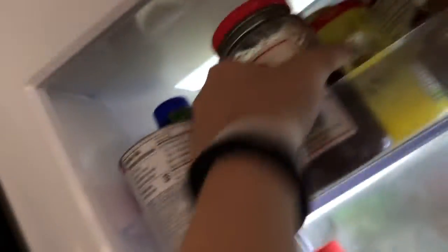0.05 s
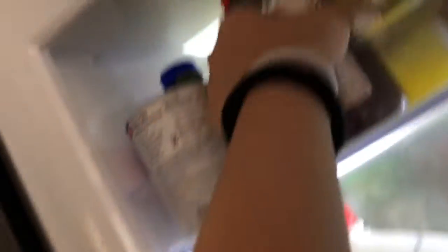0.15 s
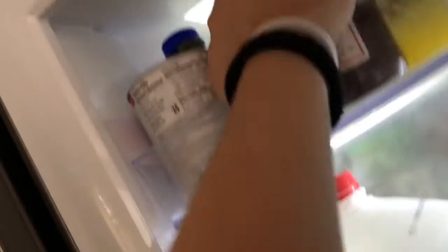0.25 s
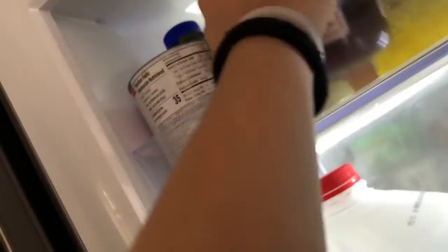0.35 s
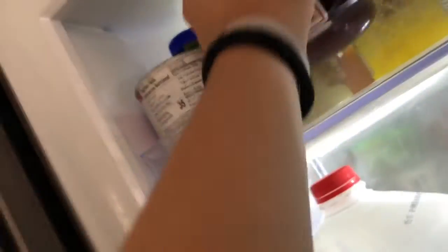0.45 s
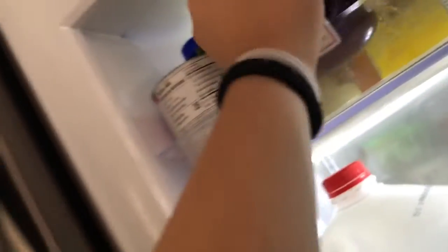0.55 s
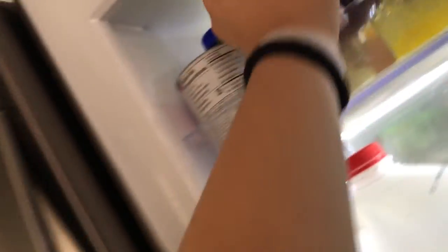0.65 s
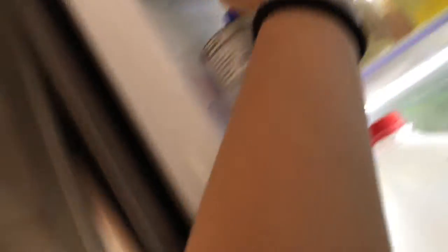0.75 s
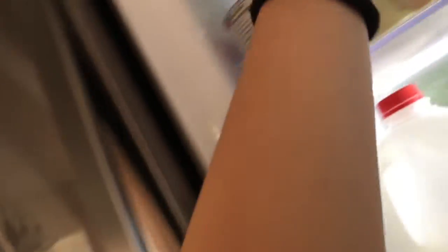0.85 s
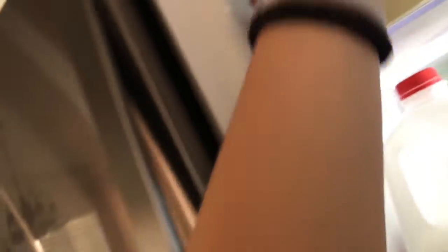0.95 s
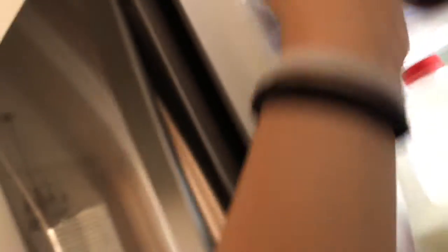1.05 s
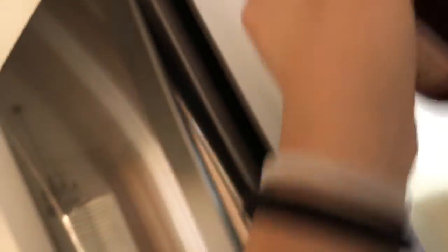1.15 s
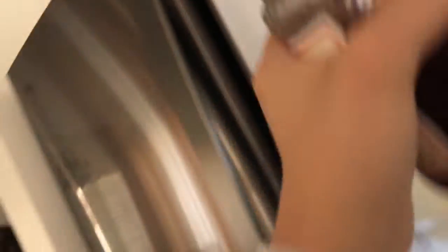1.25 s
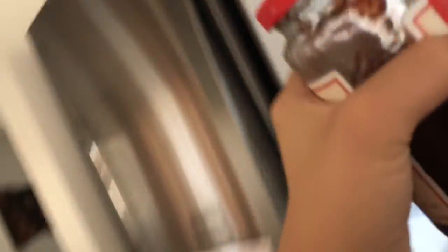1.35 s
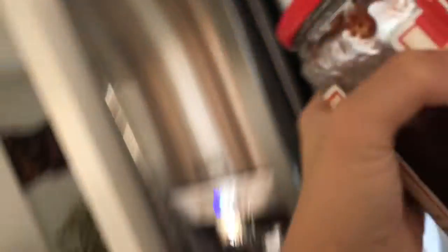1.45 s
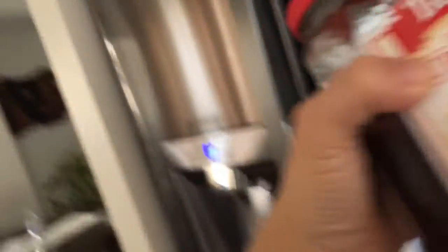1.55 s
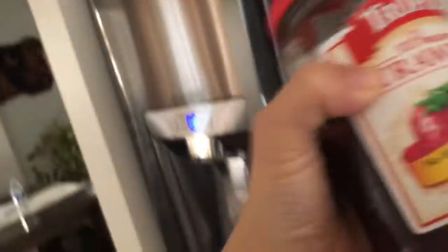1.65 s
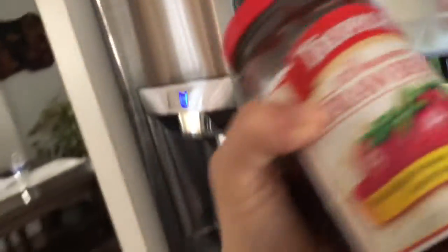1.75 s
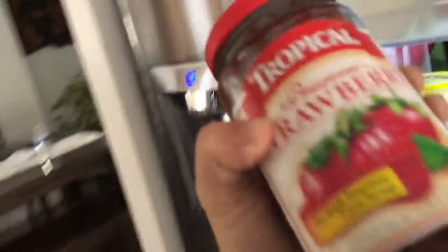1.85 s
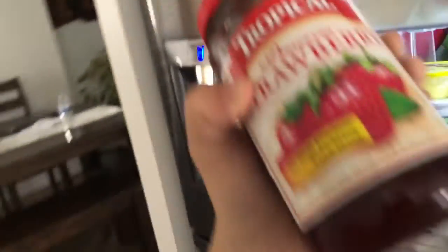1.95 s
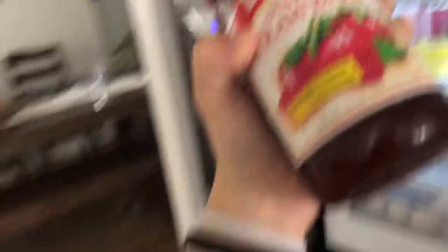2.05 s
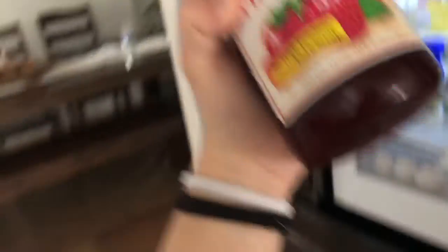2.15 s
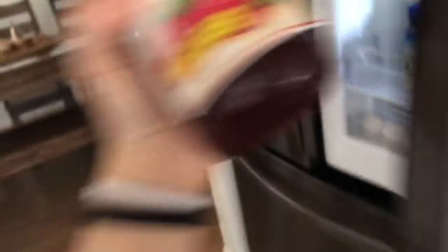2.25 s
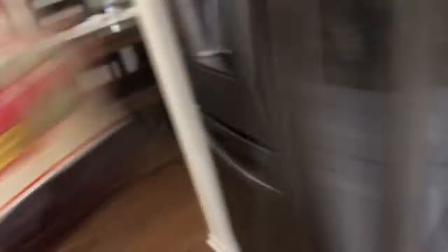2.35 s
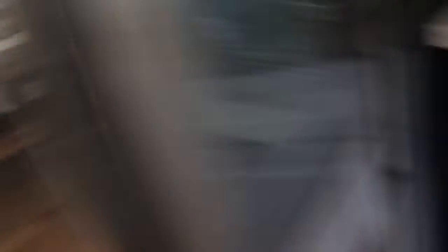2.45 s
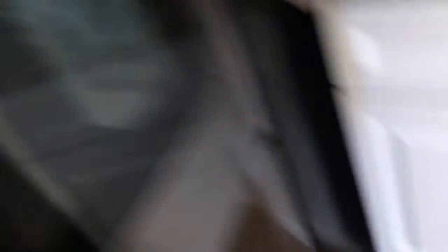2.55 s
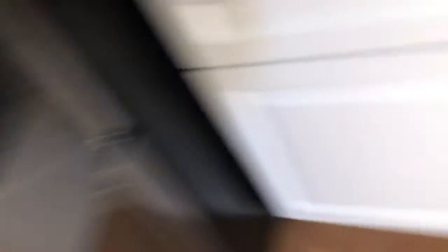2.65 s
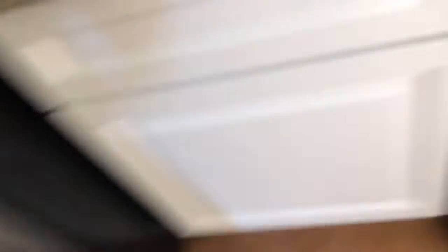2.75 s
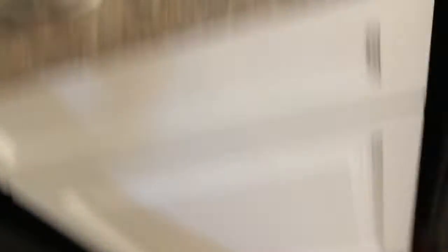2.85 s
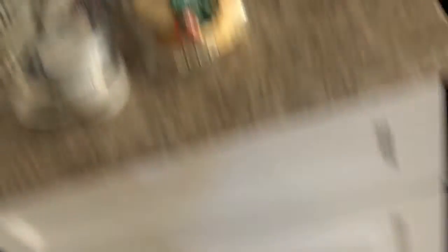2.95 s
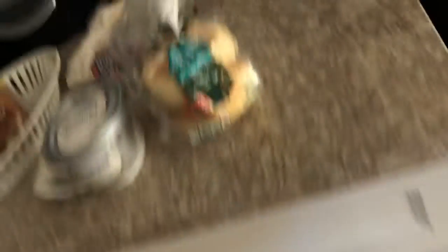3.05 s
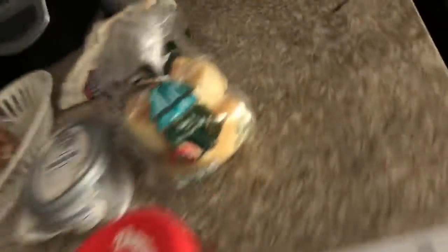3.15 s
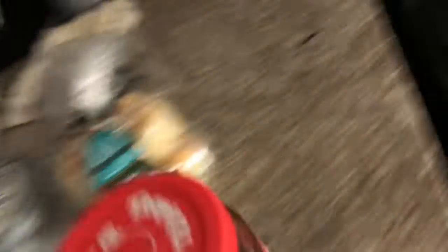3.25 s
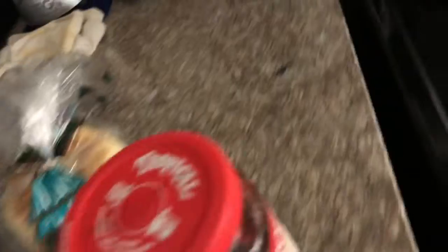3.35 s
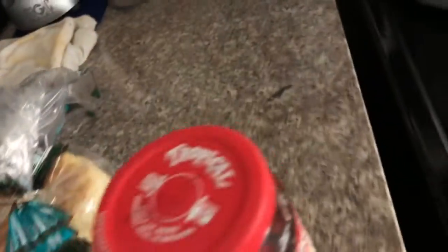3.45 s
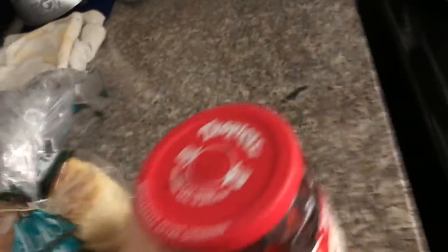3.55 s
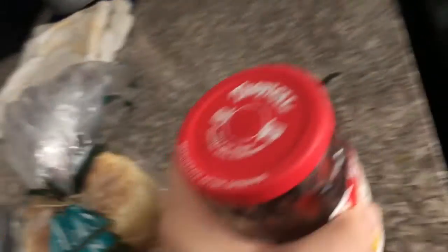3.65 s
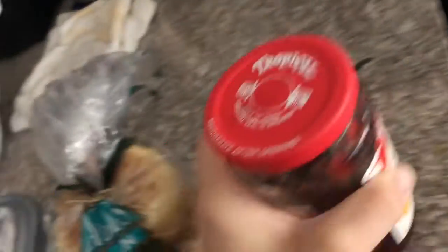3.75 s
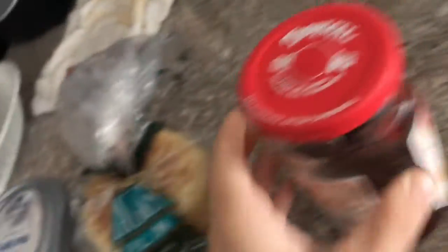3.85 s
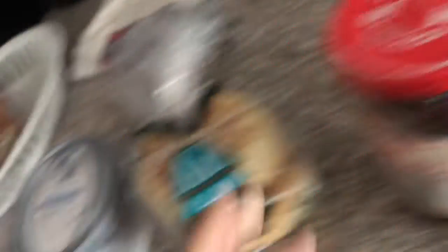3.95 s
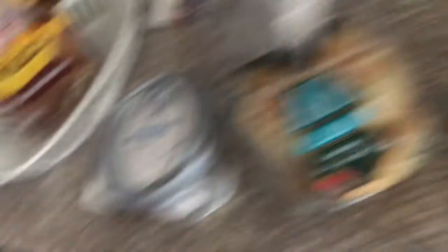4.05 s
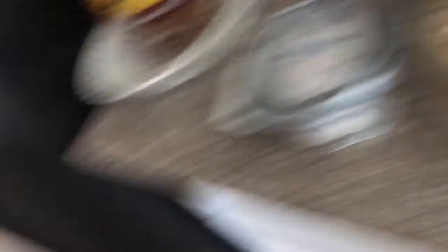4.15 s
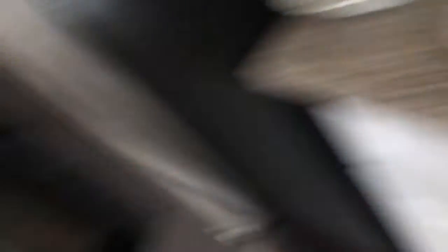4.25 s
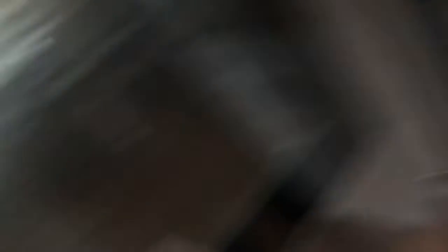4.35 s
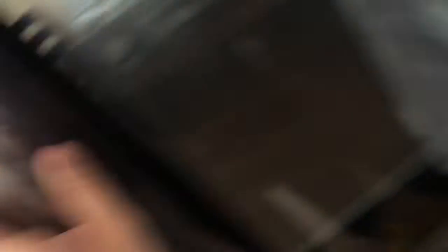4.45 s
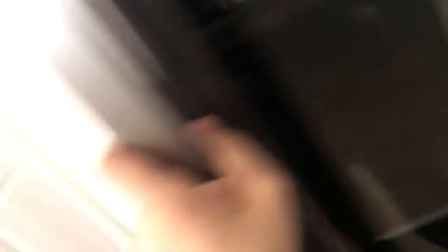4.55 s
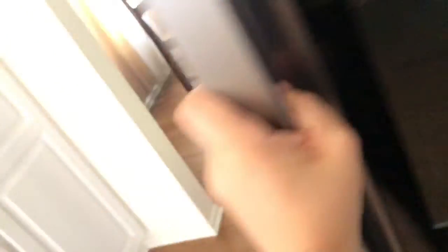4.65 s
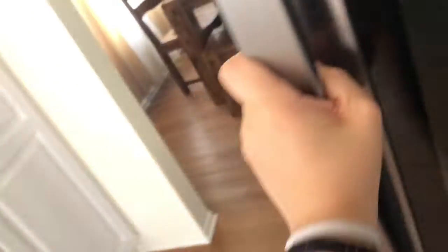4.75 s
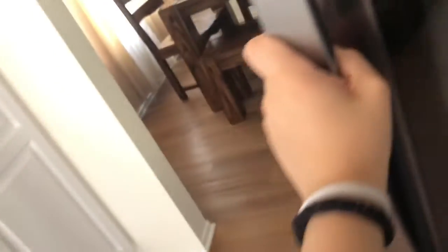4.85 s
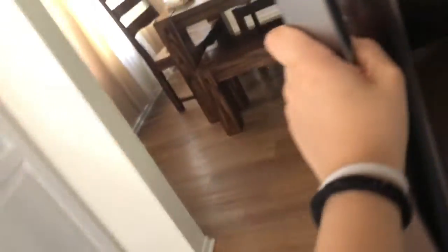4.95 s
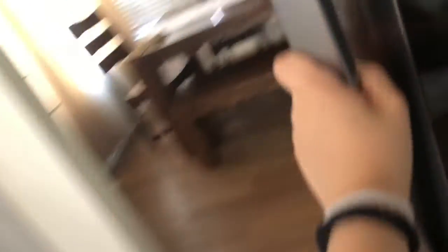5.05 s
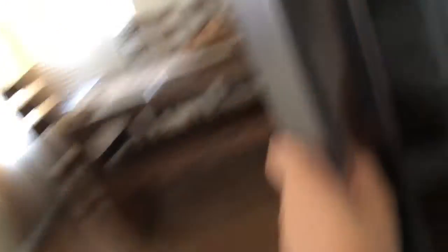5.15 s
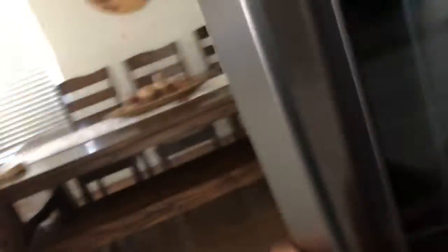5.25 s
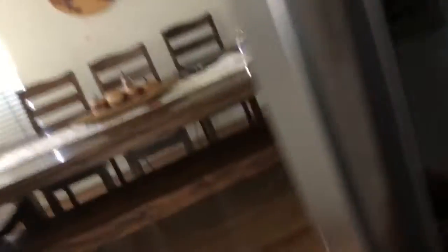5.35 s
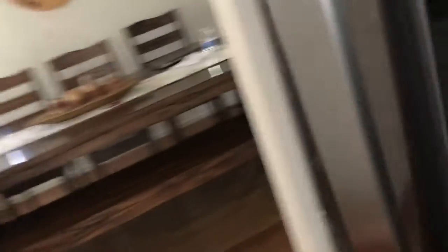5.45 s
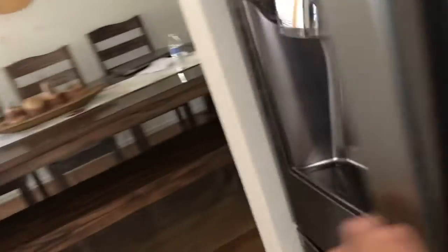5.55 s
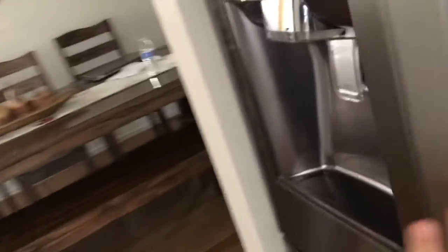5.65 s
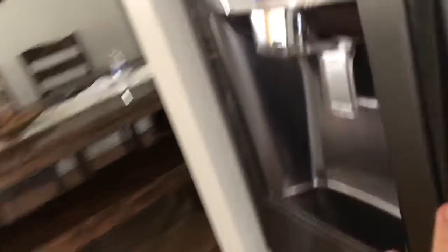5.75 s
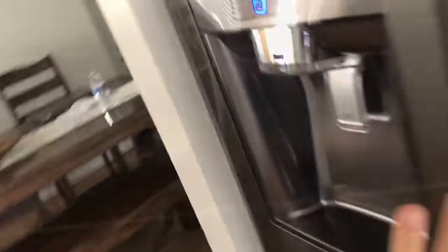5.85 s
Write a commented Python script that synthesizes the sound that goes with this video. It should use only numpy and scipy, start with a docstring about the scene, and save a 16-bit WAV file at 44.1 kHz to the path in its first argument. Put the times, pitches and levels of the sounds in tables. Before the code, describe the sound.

A glass jar scrapes and clatters out of a fridge door bin, cloth rustles, metal jingles, then the jar thumps onto a stone counter.

```python
"""A kitchen: a glass jam jar is pulled from a refrigerator door bin, scraping and knocking on bottles and plastic.
Feet and clothes shuffle across the floor, a small metal piece jingles, and the jar is set down hard on a stone counter.
The door is moved and its bottles rattle again; the compressor hums, and the loud knocks overload the microphone.
Blows are decaying modes with a noise crack and a boom; rubbing, steps and air are shaped noise; the hum is sine lines."""
import sys
import numpy as np
from scipy import signal
from scipy.fft import rfft, irfft, next_fast_len
from scipy.io import wavfile
from scipy.ndimage import uniform_filter1d, map_coordinates

SR = 44100
rng = np.random.default_rng(int(sys.argv[2]) if len(sys.argv) > 2 else 0)


def store_pcm(level_fs):
    """Save levels as 16-bit WAV."""
    pcm = np.round(np.clip(level_fs, -1, 1) * 32767).astype(np.int16)
    wavfile.write(sys.argv[1], SR, np.atleast_2d(pcm).T)


N = 260362
T = np.arange(SR * 3 // 4) / SR  # time axis of one short event, in seconds

# The jar hits its neighbours in the door bin.
# Each row: start in seconds, strength in dB, hardness in dB, favoured pitch in Hz.
KNOCK_CONTACTS = [(.260, -13, -5, 1130), (.282, -11.5, 9.5, 2940), (.312, -13.5, -5, 1700),
                  (.355, 1.5, 8, 1040), (.490, -14.5, 8, 1980), (.496, 9, 5.5, 2491), (.522, 1, -13.5, 700),
                  (.544, -5, 5, 2000), (.572, -5.5, -3, 2410), (.597, -2, 0.5, 1000),
                  (.619, -4.5, -1, 2060), (.679, -8.5, -3, 1800), (.700, -4.5, -8.5, 950),
                  (.744, -12, -2, 2298), (.770, -5.5, -2.5, 2587)]
# Noise colour of a crack or of grit. Each row: frequency in Hz, relative density in dB per Hz.
CRACK_SPECTRUM = [(400, -13), (1200, -1.5), (3000, -2), (6000, -4), (10000, -9.5), (16000, -14.5)]
# Noise colour of cloth and soles. Each row: frequency in Hz, relative density in dB per Hz.
HISS_SPECTRUM = [(1500, -18), (3000, -4.5), (4500, -2.5), (6000, -1), (8000, -0.5), (10000, -2.5),
                 (12000, -3.5), (15500, -2.5)]


def amp(db):
    """Decibels to gain."""
    return 10 ** (np.asarray(db) / 20)


def unit(x):
    """Scale to rms 1."""
    return x / np.sqrt(np.mean(x ** 2) + 1e-20)


def along(points, hz):
    """(Hz, value) points read on a log frequency axis."""
    f, v = np.transpose(points)
    return np.interp(np.log(hz + 1), np.log(f + 1), v)


def curve(rows):
    """(s, value) points read at every sample of the scene."""
    return np.interp(np.arange(N) / SR, *np.transpose(rows))


def fade(t60):
    """A decay of 60 dB in t60 seconds."""
    return np.exp(-np.log(1000) * T / t60)


def filtered(x, response):
    """x filtered by a response given as a function of frequency in Hz."""
    m = next_fast_len(len(x) + 8192)
    return irfft(rfft(x, m) * response(np.fft.rfftfreq(m, 1 / SR)), m)[:len(x)]


def noise(spectrum, size=len(T)):
    """Coloured noise of rms 1."""
    return unit(filtered(rng.standard_normal(size), lambda hz: amp(along(spectrum, hz))))


def add(track, s, sound):
    """Mix a sound in at time s, in seconds."""
    start = max(round(s * SR), 0)
    track[start:start + len(sound)] += sound[:max(N - start, 0)]


def kitchen(x, wet_db):
    """Direct sound plus the answer of cupboards and walls: decaying noise, each band with its own decay time."""
    # Decay of the room. Each row: frequency in Hz, t60 in seconds.
    room_t60 = [(100, 0.41), (300, 0.72), (800, 0.56), (2000, 0.55), (5000, 0.66), (14000, 0.22)]
    # Colour of the room's answer. Each row: frequency in Hz, gain in dB.
    room_colour = [(60, -6.5), (300, 0.5), (1000, -0.5), (2500, -4), (6000, -5.5), (10000, -0.5),
                   (15000, -10)]
    hz, t, bands = signal.stft(rng.standard_normal(len(T)), SR, nperseg=256)
    decay = np.exp(-np.log(1000) * t / along(room_t60, hz)[:, None])
    tail = signal.istft(bands * decay, SR, nperseg=256)[1][:len(T)]
    tail = tail * (1 - fade(0.015))
    tail = filtered(tail / np.linalg.norm(tail), lambda f: amp(along(room_colour, f)))
    delayed_tail = np.pad(tail, (SR // 250, 0))  # the answer starts after 4 ms
    return x + amp(wet_db) * signal.fftconvolve(x, delayed_tail)[:N]


def refrigerator():
    """Slightly unsteady compressor lines over broad fan and room noise."""
    # Compressor lines. Each row: frequency in Hz, mean level in dB rms.
    hum_lines = [(59.2, -52), (101, -61), (161.5, -59), (317.6, -58.5), (371.4, -55), (2046, -65.5)]
    # Colour of fans and room. Each row: frequency in Hz, relative density in dB per Hz.
    air_spectrum = [(15, -43), (25, -31), (48, -0.5), (66, -2.5), (82, -10), (212, -5), (277, -10),
                    (373, -10.5), (451, -10.5), (503, -13.5), (1130, -20.5), (2050, -21), (2910, -27),
                    (3820, -26), (16000, -38)]
    # Level of that air at the microphone. Each row: time in seconds, level in dB.
    air_level = [(0, -44), (2.2, -43), (3, -46.3), (5.9, -46)]
    t = np.arange(N) / SR

    def drift():
        """A smooth random wander with four new values a second."""
        return map_coordinates(rng.standard_normal(40), [t * 4])

    hum = np.zeros(N)
    for hz, db in hum_lines:
        level = amp(db + 0.54 * drift()) * np.sqrt(2)
        hum += level * np.sin(2 * np.pi * hz * t + 0.33 * drift())
    return hum + amp(curve(air_level)) * noise(air_spectrum, size=N)


def thuds(width):
    """Soft contacts: a short swell of noise around one pitch; width is in natural-log units of frequency."""
    # Footfalls and bumps of the hand. Each row: start in seconds, level in dB, pitch in Hz.
    bumps = [(2.246, -39, 70.6), (2.344, -44, 70), (2.456, -36, 61), (2.499, -35.5, 65), (2.55, -38.5, 332),
             (2.709, -36, 69.4), (2.775, -41.5, 135), (4.295, -35, 122), (4.349, -34, 70),
             (4.386, -44, 168), (5.772, -36, 177)]
    out = np.zeros(N)
    size = round(0.064 * SR)  # length of a thud: 64 ms
    swell = np.sin(np.pi * np.linspace(0, 1, size)) ** 0.16
    for s, db, pitch_hz in bumps:
        def around_pitch(hz):
            return np.exp(-.5 * (np.log((hz + 1) / pitch_hz) / width) ** 2)
        band = filtered(rng.standard_normal(len(T)), around_pitch)
        add(out, s, amp(db) * unit(band[:size] * swell))
    return out


def squeaks():
    """Skin and seals rub: a narrow, rough tone that sinks as the rub slows."""
    # The hand rubs on jar and door. Each row: start in seconds, level in dB, starting pitch in Hz, length in seconds.
    rubs = [(1.51, -39.5, 302.7, 0.18), (1.53, -41, 784, 0.098), (1.797, -47, 908, 0.18),
            (4.383, -45.5, 3450, .03), (5.203, -55, 6150, .24), (5.499, -46.5, 3310, .11),
            (5.51, -52, 1940, .1)]
    sink = .07  # share of its pitch that a rub loses
    out = np.zeros(N)
    for s, db, pitch_hz, length in rubs:
        progress = np.clip(T / length, 0, 1)
        phase = 2 * np.pi * np.cumsum(pitch_hz * (1 - sink * progress)) / SR
        rough = np.zeros(len(T))
        for wave in (np.sin, np.cos):
            rough += uniform_filter1d(rng.standard_normal(len(T)), size=130) * wave(phase)
        add(out, s, amp(db) * unit(rough) * np.sqrt(np.abs(np.sin(np.pi * progress))))
    return out


def slides():
    """A sole or sleeve touches, speeds up and glides out; fibres catch and make the hiss grainy."""
    # Soles and cloth. Each row: start in seconds, rise in seconds, fall by 20 dB in seconds,
    # level in dB, hiss over scuff in dB.
    strokes = [(.021, 0.063, 0.037, -35.5, -8), (1.31, 0.091, .075, -48, -6), (1.511, 0.084, .1, -35, -1),
               (2.554, 0.072, .09, -34.5, -6.5), (2.68, 0.097, 0.18, -42, -14),
               (3.106, .009, 0.087, -31.5, 3.5), (3.3, 0.088, 0.26, -48, -19),
               (3.978, 0.096, 0.45, -45.5, -14), (4.37, 0.067, 0.12, -32.5, 28),
               (4.47, 0.064, 0.17, -35, 26), (4.875, .02, 0.25, -38, 21), (5.1, 0.19, 0.32, -36.5, 13),
               (5.600, 0.02, 0.21, -26.5, 10)]
    # Colour of the duller scuff. Each row: frequency in Hz, relative density in dB per Hz.
    scuff_spectrum = [(150, -13), (300, -3.5), (700, -14.5), (1300, -13), (2500, -14.5), (4000, -16.5),
                      (7000, -21.5), (15000, -27)]
    swell_db_per_s = 63
    # abrupt slides are duller: hiss tilt in dB per octave, for each doubling of the rise past the even one
    tilt_step_db, even_rise_s, most_tilt_db = 3, 0.04, 6
    out = np.zeros(N)
    for s, rise, fall, level_db, hiss_db in strokes:
        speed_db = np.minimum(swell_db_per_s * (T - rise), -20 * (T - rise) / fall)
        tilt_db = np.clip(tilt_step_db * np.log2(rise / even_rise_s), -most_tilt_db, most_tilt_db)
        fibres = amp(1.1 * unit(uniform_filter1d(rng.standard_normal(len(T)), size=90)))
        hiss = noise([(hz, db + tilt_db * np.log2(hz)) for hz, db in HISS_SPECTRUM])
        # a near reflection, its lag growing, colours the moving source
        lag = rng.uniform(.0003, .0007) * SR * (1 + T)
        hiss = unit(hiss + 0.29 * map_coordinates(hiss, [T * SR - lag]))
        rub = unit(amp(hiss_db) * hiss + noise(scuff_spectrum))
        add(out, s, amp(level_db + speed_db) * (1 - fade(0.0056)) * fibres * rub)
    return out


def ring(modes, scatter_db, attack, dense_db, detune, life=1):
    """Struck modes over a dense cluster of weak ones; each blow excites them differently, life scales their decay."""
    hz, db, t60 = np.transpose(modes)
    gains = amp(db + scatter_db * rng.standard_normal(len(hz)))
    tuning = hz * np.exp(detune * rng.standard_normal(len(hz)))
    phases = rng.uniform(0, 2 * np.pi, len(hz))
    waves = np.zeros(len(T))
    for gain, f, phase, decay in zip(gains, tuning, phases, t60):
        waves += gain * np.sin(2 * np.pi * f * T + phase) * fade(decay * life)
    outline = [(hz[0] / 2, db[0] - 36), *zip(hz, db), (hz[-1] * 2, db[-1] - 43.0)]
    cluster = amp(dense_db) * noise(outline) * fade(np.mean(t60) * life)
    return (waves / np.linalg.norm(gains) + cluster) * (1 - np.exp(-T / attack))


def ticks():
    """Fingers and cloth tick lightly: short decaying hiss."""
    # Each row: start in seconds, level in dB.
    touches = [(.02, -35), (0.176, -38), (.212, -38), (1.34, -38.5), (1.496, -41), (2.001, -43),
               (4.829, -38), (5.052, -36.5)]
    out = np.zeros(N)
    for s, db in touches:
        add(out, s, amp(db) * noise(HISS_SPECTRUM) * fade(0.055))
    return out


def jingles():
    """A small metal piece chinks and bounces: high modes with a tiny crack, weaker chinks damped sooner."""
    # Each row: start in seconds, level in dB.
    chinks = [(2.784, -22), (2.790, -16), (2.811, -25.5), (2.856, -28), (2.892, -27), (3.009, -29)]
    # Resonances of the metal piece. Each row: frequency in Hz, level in dB, free t60 in seconds.
    trinket = [(4970, -5, 0.105), (6620, 11, 0.024), (6830, 4, 0.092), (8850, 3.5, 0.053),
               (11500, -7, 0.29), (15250, -1, 0.21)]
    hardest_db = max(db for s, db in chinks)
    out = np.zeros(N)
    for s, db in chinks:
        # share of the free ringing time: 0.76 for the hardest chink
        life = 0.76 * amp(.45 * (db - hardest_db))
        chink = ring(trinket, scatter_db=2.0, attack=.0001, dense_db=-17.0, detune=0.0021, life=life)
        crack = amp(-4.5) * noise(CRACK_SPECTRUM) * fade(0.0064)
        add(out, s, amp(db) * (chink + crack))
    return out


def focused(modes, focus_hz, boost_db=6):
    """The spot that is hit favours the modes around one pitch."""
    return [(hz, db + boost_db * np.exp(-8 * np.log(hz / focus_hz) ** 2), t60) for hz, db, t60 in modes]


def blows(contacts, glass, support, crack_db, boom_db, boom_growth, boom_lag, crack_t60, boom_attack,
          scatter_db, dense_db, soft_attack, detune):
    """Each contact cracks and rings the containers; what they stand on booms, mostly under heavy, soft blows."""
    hard_boom_loss = 0.44  # dB of boom lost per dB of hardness: glass on glass cracks, glass on plastic booms
    out = np.zeros(N)
    for s, db, hardness_db, focus_hz in contacts:
        # contacts with little crack build up slowly
        softness = np.clip((-crack_db - hardness_db - 21.5) / 5, 0, 1)
        attack = 0.00027 + soft_attack * softness
        glass_ring = ring(focused(glass, focus_hz), scatter_db, attack, dense_db, detune)
        add(out, s, amp(db) * glass_ring)
        boom_level_db = boom_db + boom_growth * db - hard_boom_loss * hardness_db
        boom = ring(support, scatter_db, boom_attack, dense_db, detune)
        add(out, s + boom_lag, amp(boom_level_db) * boom)
        add(out, s, amp(db + crack_db + hardness_db) * noise(CRACK_SPECTRUM) * fade(crack_t60))
    return out


def swinging_door():
    """The moved door shakes its bottles: glass rings and the door panel booms."""
    # Each row: start in seconds, strength in dB, hardness in dB, favoured pitch in Hz.
    rattles = [(5.772, -24, 9, 2130), (5.852, -5, -7, 2500), (5.8645, -13, 9.5, 1000),
               (5.870, -4, -9, 2240), (5.889, 2.5, 11, 2420)]
    # Resonances of the jars. Each row: frequency in Hz, level in dB, t60 in seconds.
    door_jars = [(835, -6.5, 0.016), (1020, -4, 0.03), (1460, -16, 0.086), (1693, -6.5, 0.079),
                 (2260, -4, 0.027), (2470, -6, 0.018), (3370, -22, .05), (4810, -9, 0.061),
                 (6700, -24, 0.069), (8800, -22, 0.028)]
    # Resonances of the door. Each row: frequency in Hz, level in dB, t60 in seconds.
    door_panel = [(92, 2, 0.064), (138, -7, .08), (193, -8.5, 0.36), (288, -12, 0.095), (414, 4.5, 0.041),
                  (526, -2, 0.11), (650, -1, 0.067)]
    return blows(rattles, door_jars, door_panel, crack_db=-9, boom_db=-4, boom_growth=4.3, boom_lag=-0.00213,
                 crack_t60=0.023, boom_attack=0.0017, scatter_db=1.5, dense_db=-10.5,
                 soft_attack=0.00068, detune=0.013)


def drag():
    """Glass sticks and slips on plastic at an uneven rate; the bin's resonances shift as the jar travels."""
    # Level of the scrape. Each row: time in seconds, level in dB.
    drag_level = [(0, -52.5), (.06, -42.5), (.17, -34), (.27, -40), (.38, -19), (.46, -23), (.6, -20),
                  (.77, -18.5), (.92, -68)]
    # Resonances of the bin. Each row: centre in Hz, width in Hz, level in dB.
    drag_body = [(234, 23, -2), (335, 11.3, 9), (553, 190, -8.5), (850, 188, 2), (1015, 128, 1),
                 (1456, 660, -13.5), (2900, 410, -22.5)]
    # Each row: time in seconds, pitch ratio of the resonances.
    drag_pitch = [(.1, 1.11), (.25, 0.92), (.47, .94), (.6, 1.17)]
    # about 700 slips a second before the pitch shift, over fine roughness
    slips = (rng.random(N) < 700 / SR) * rng.uniform(0.99, 1, N)
    slips = slips + 0.079 * rng.standard_normal(N)

    def body(f):
        """Resonances in parallel with alternating sign."""
        total = 0
        for k, (centre, width, db) in enumerate(drag_body):
            damping = 1j * f * width
            total = total + (-1) ** k * amp(db) * damping / (centre ** 2 - f * f + damping)
        return total

    read_position = np.cumsum(curve(drag_pitch))
    groan = map_coordinates(unit(filtered(slips, body)), [read_position], order=3)
    grit = noise(CRACK_SPECTRUM, size=N)
    return amp(curve(drag_level)) * (groan + amp(-23.5) * grit)


def rebounds(contacts):
    """A knocked bottle rebounds once: every knock is answered a moment later by a weaker, softer one."""
    flights = .008 * rng.uniform(.7, 1.3, len(contacts))  # seconds
    loss_db, softer_db = 6.5, 7
    return [(s + flight, db - loss_db, hardness_db - softer_db, hz)
            for (s, db, hardness_db, hz), flight in zip(contacts, flights)]


def jostle(count):
    """The hardest knock leaves the bottles jostling: light, uneven contacts that die away."""
    gap_s, level_db, fall_db_per_s, hardness_db, pitch_hz = .016, -9, 59, -3.5, 1680
    start = max(KNOCK_CONTACTS, key=lambda knock: knock[1])[0]
    chance = rng.standard_normal((count, 3))
    ages = gap_s * (1 + np.arange(count) + .25 * chance[:, 0])
    return [(start + age, level_db - fall_db_per_s * age + 2.1 * size, hardness_db, pitch_hz * np.exp(0.21 * spot))
            for age, (_, size, spot) in zip(ages, chance)]


def door_bin():
    """The jar knocks its neighbours in the bin: bottles ring, the plastic shelf booms."""
    # Resonances of the bottles. Each row: frequency in Hz, level in dB, t60 in seconds.
    bottles = [(557, -4.5, 0.15), (820, 2.5, 0.08), (942, 2.5, 0.071), (1056, -2, 0.048), (1227, -3, 0.057),
               (1439, 5.5, 0.035), (1585, 2.5, 0.024), (2030, 0.5, 0.042), (2330, -4.5, 0.037),
               (2570, -9, 0.02), (2700, -7, 0.036), (3400, -7, 0.051), (3890, -14, 0.085),
               (5410, -13, 0.05)]
    # Resonances of the shelf. Each row: frequency in Hz, level in dB, t60 in seconds.
    shelf = [(80.3, -15, 0.28), (102.2, -13, 0.32), (145, -7.5, 0.058), (188.6, -6.5, 0.17),
             (231, -8.5, 0.16), (294, -11, 0.14), (375.8, -7.5, 0.31), (431, -1.5, 0.05)]
    contacts = [*KNOCK_CONTACTS, *rebounds(KNOCK_CONTACTS), *jostle(count=9)]
    return blows(contacts, bottles, shelf, crack_db=-12.5, boom_db=-11.5, boom_growth=1.21, boom_lag=0.00077,
                 crack_t60=0.04, boom_attack=0.0037, scatter_db=4.0, dense_db=-5,
                 soft_attack=0.00082, detune=0.018)


def counter():
    """The jar lands on stone and rocks to rest, the cabinet booms; two close tones keep beating faintly."""
    # Each row: start in seconds, strength in dB, hardness in dB, favoured pitch in Hz.
    landing = [(3.630, -32, -20, 1194), (3.651, 4, 7, 1160), (3.656, -1.5, -3, 800),
               (3.702, -12.5, -13, 1000), (3.717, -14.5, -27, 950), (3.814, -19, -1, 515)]
    # Resonances of the jar. Each row: frequency in Hz, level in dB, t60 in seconds.
    jar = [(383, -4, 0.058), (537, 4, 0.041), (650, 0, 0.12), (771, -2, 0.11), (931, -3, 0.12),
           (1164, 2, 0.076), (1290, -8, .04), (1453, 3.5, 0.042), (1675, -3.5, 0.1), (2025, -3, 0.037),
           (2455, -8, 0.13), (3730, -20, 0.171), (4340, -35, 0.0468), (6070, -25.5, 0.139)]
    # Resonances under the counter. Each row: frequency in Hz, level in dB, t60 in seconds.
    cabinet = [(121, -11.5, 0.14), (150, -6, .13), (174, -5, 0.127), (300, -11, 0.109), (432, -4.5, .06)]
    # Long ringing of the jar's lid. Each row: frequency in Hz, level in dB, t60 in seconds.
    singing = [(1985.5, -40.5, 2.4), (2007, -41, 2.4)]
    out = blows(landing, jar, cabinet, crack_db=-18.5, boom_db=-6.5, boom_growth=1.67, boom_lag=.008,
                crack_t60=0.027, boom_attack=0.0086, scatter_db=2.0, dense_db=-2.5,
                soft_attack=0.00066, detune=0.006)
    out = kitchen(out, wet_db=-11.0)
    tones = sum(amp(db) * np.sin(2 * np.pi * hz * T) * fade(t60) for hz, db, t60 in singing)
    add(out, landing[1][0], tones)  # without room, from the second contact on
    return out


def scene():
    """All sources in the kitchen, one channel."""
    person = thuds(width=0.42) + squeaks() + slides() + ticks() + jingles()
    sound = refrigerator() + kitchen(person, wet_db=-8.5)
    sound += kitchen(swinging_door(), wet_db=-0.5)
    sound += kitchen(drag() + door_bin(), wet_db=-15.5)
    sound += counter()
    return sound[None]


def record(dry):
    """The microphone clips at full scale; a steep low-pass then removes what lies above the band limit."""
    top_hz = 16000
    clipped = np.clip(dry[0], -1, 1)
    return filtered(clipped, lambda hz: 1 / np.sqrt(1 + (hz / top_hz) ** 240))[None]


dry = scene()
out = record(dry)
store_pcm(out)
```